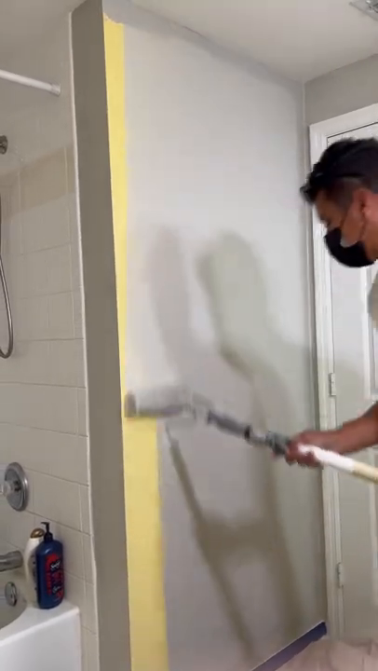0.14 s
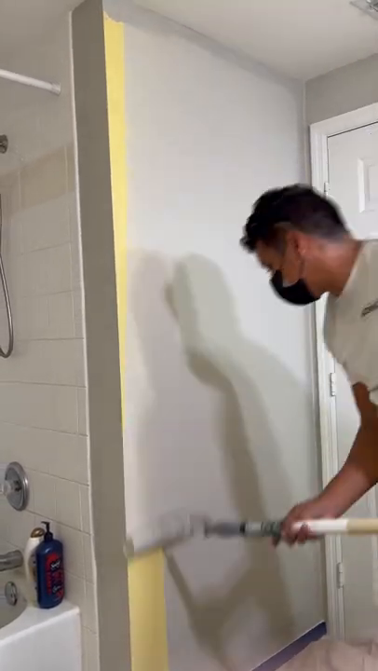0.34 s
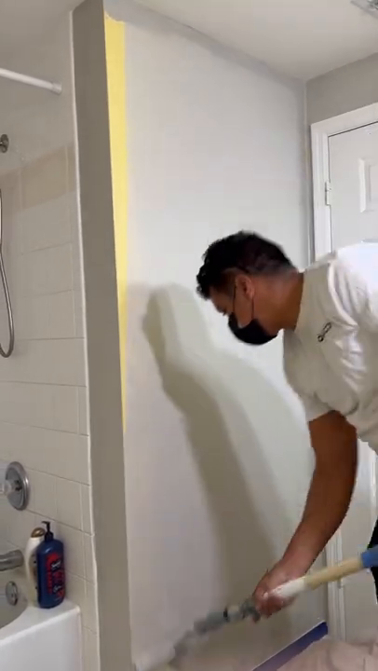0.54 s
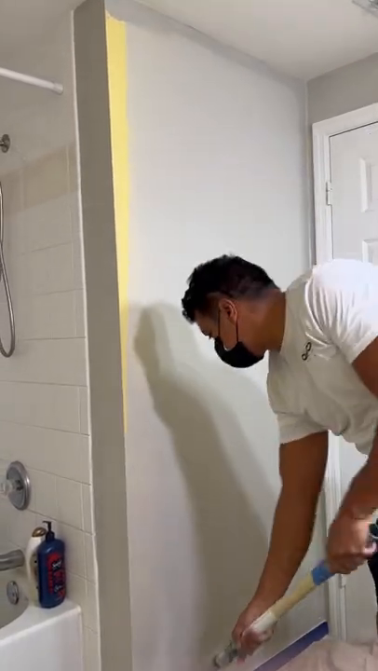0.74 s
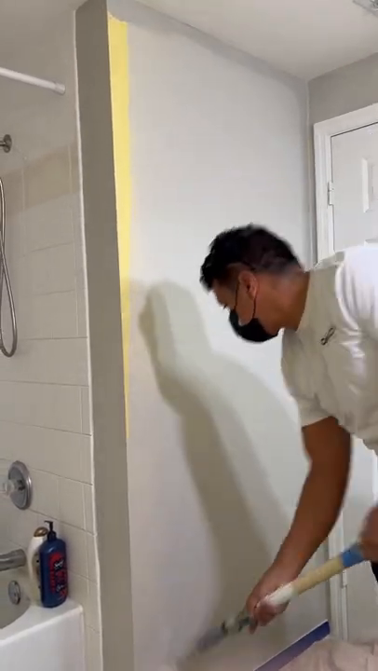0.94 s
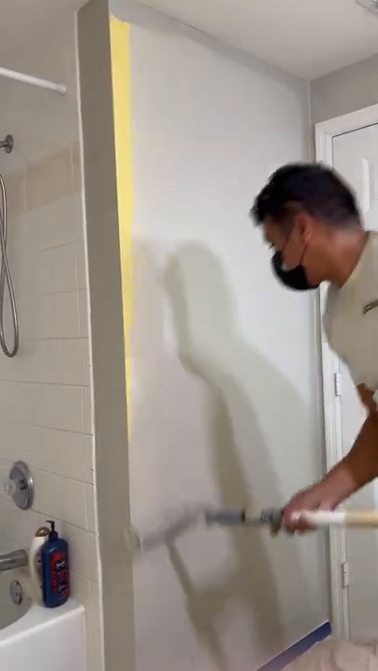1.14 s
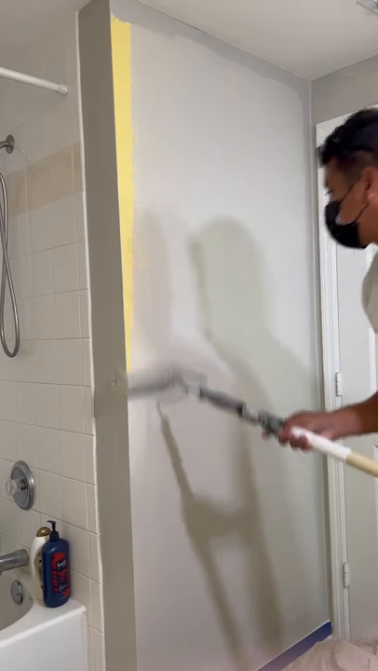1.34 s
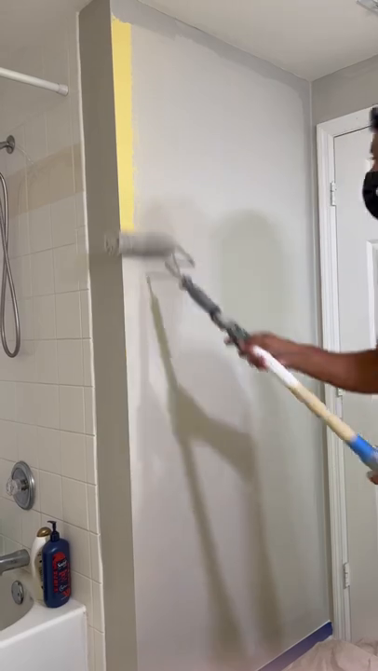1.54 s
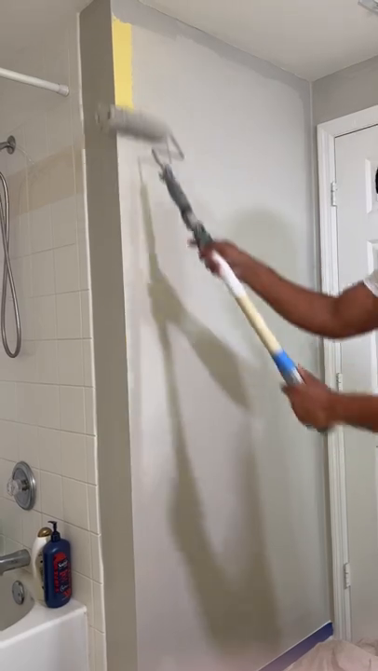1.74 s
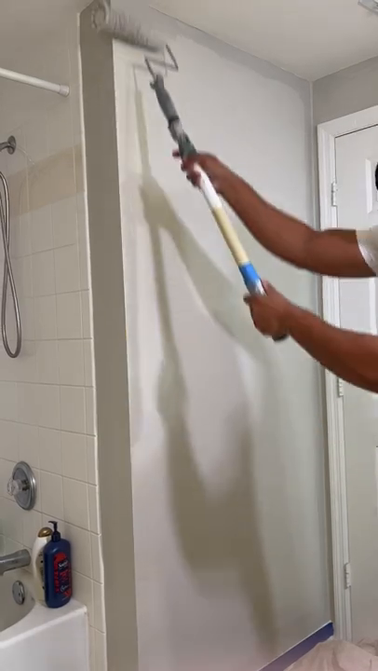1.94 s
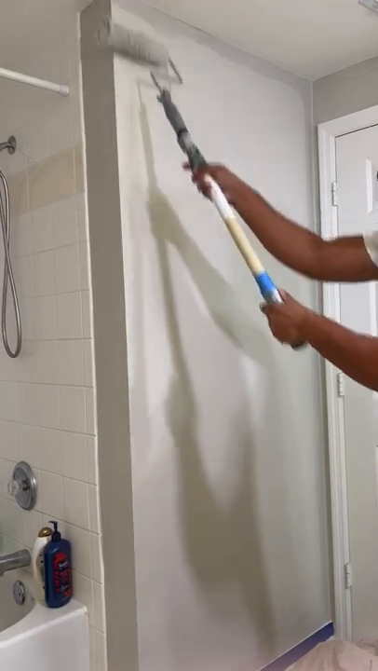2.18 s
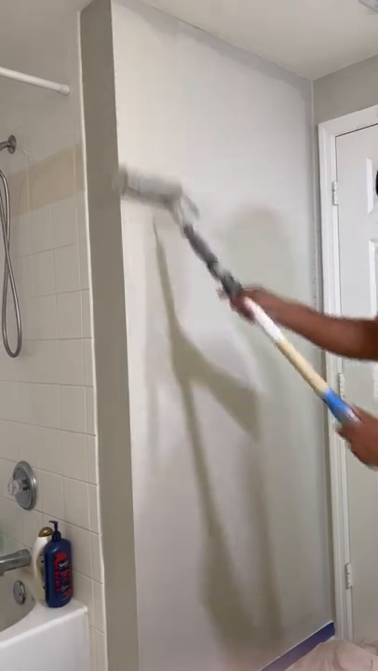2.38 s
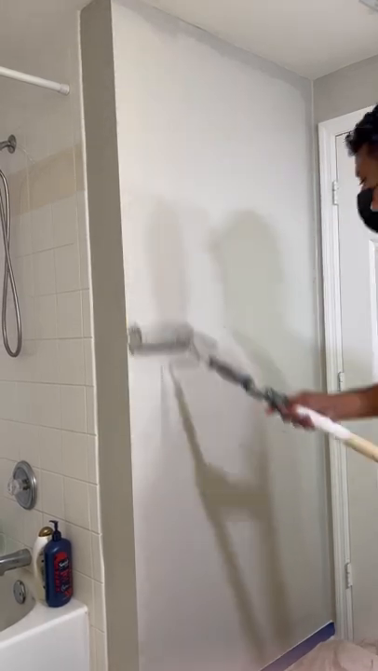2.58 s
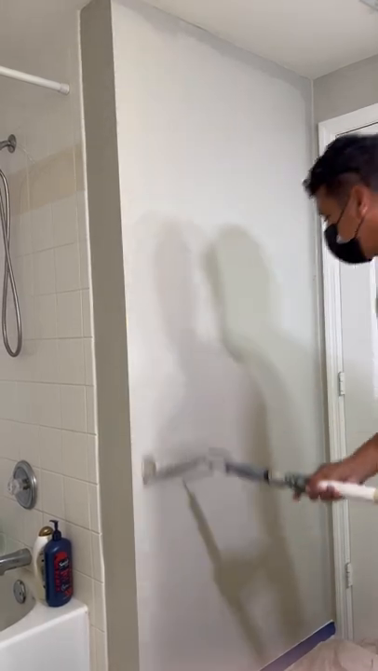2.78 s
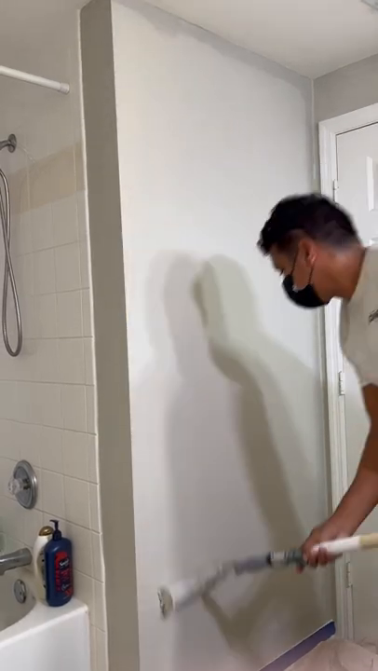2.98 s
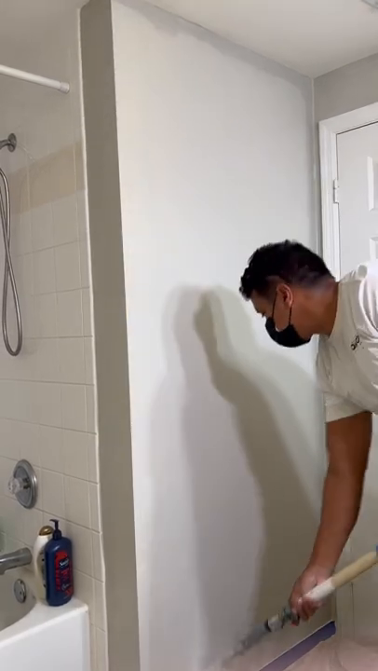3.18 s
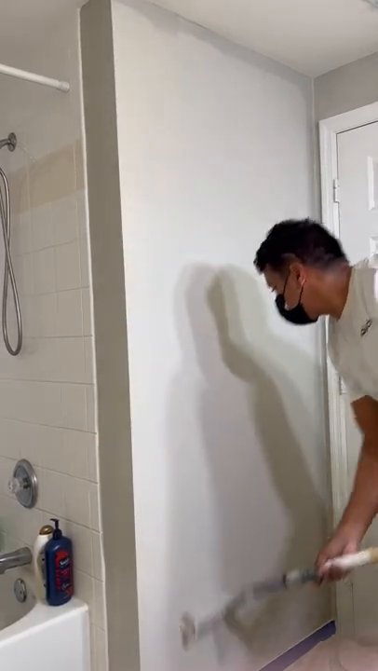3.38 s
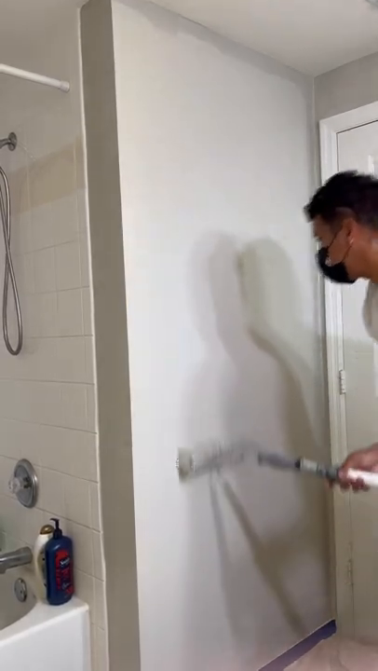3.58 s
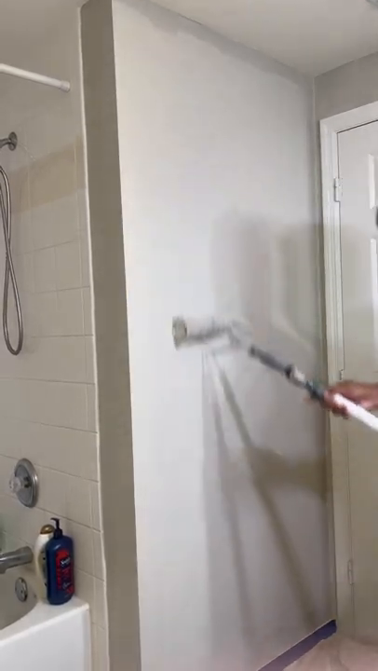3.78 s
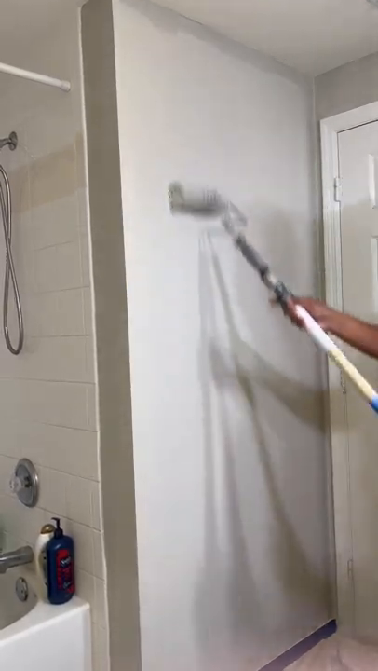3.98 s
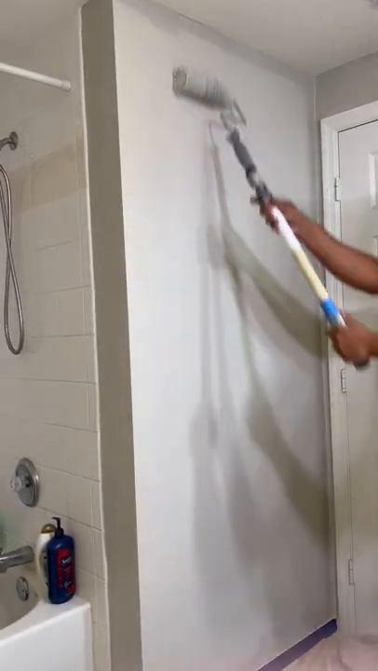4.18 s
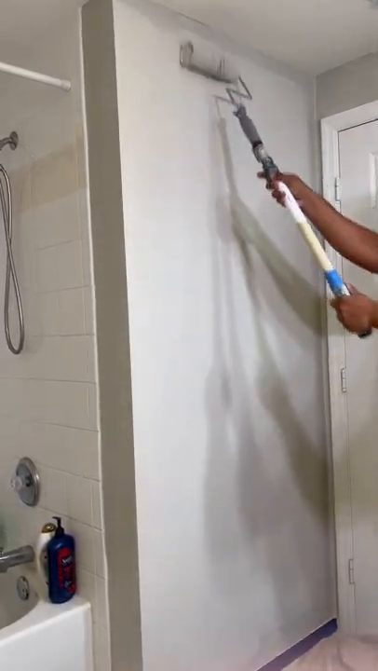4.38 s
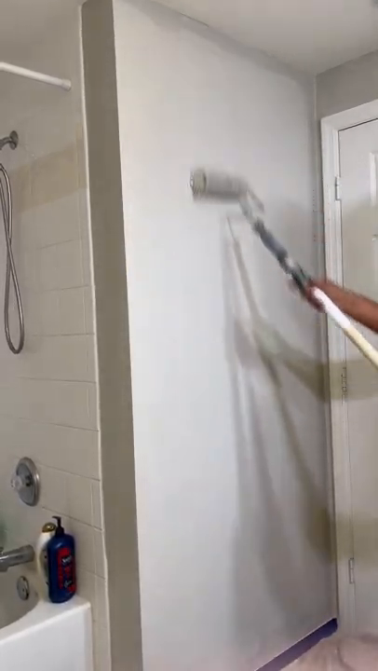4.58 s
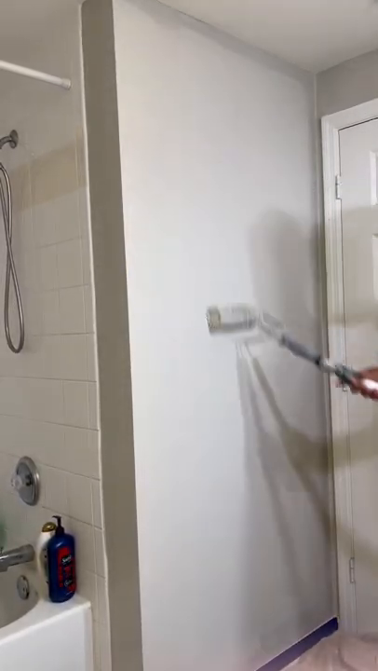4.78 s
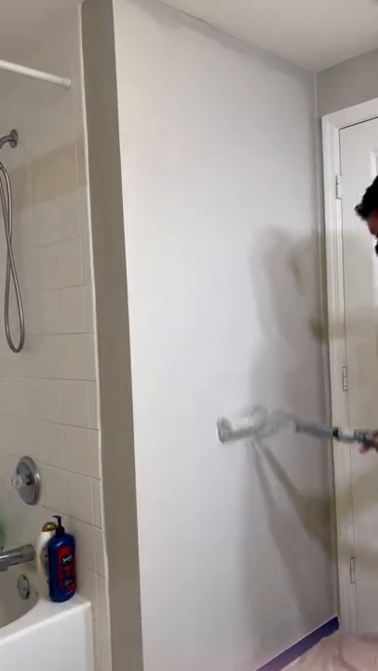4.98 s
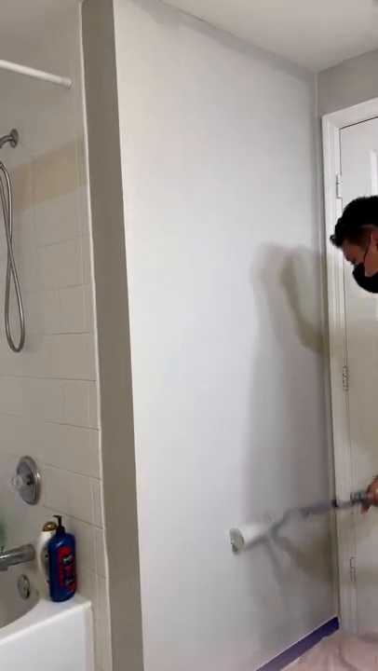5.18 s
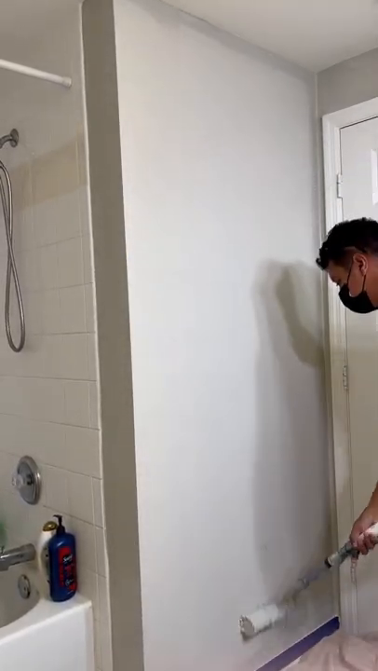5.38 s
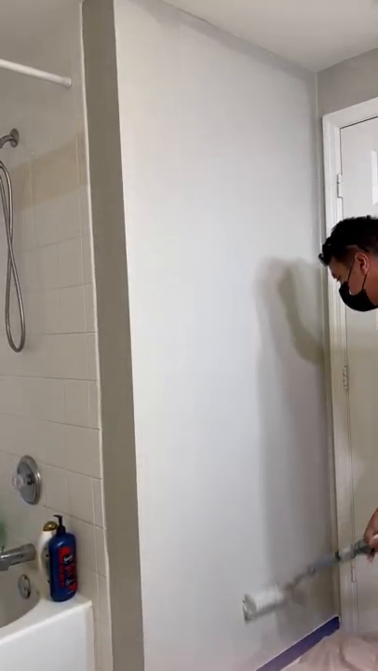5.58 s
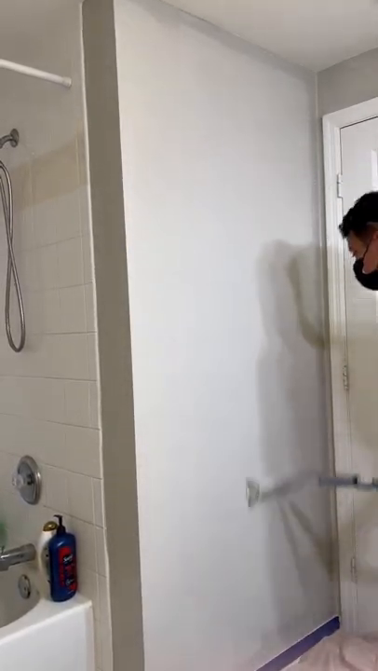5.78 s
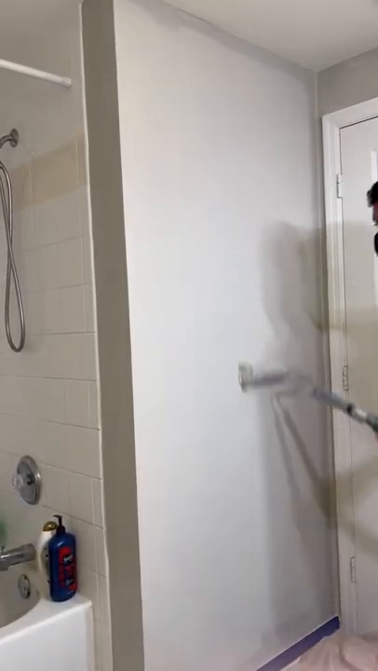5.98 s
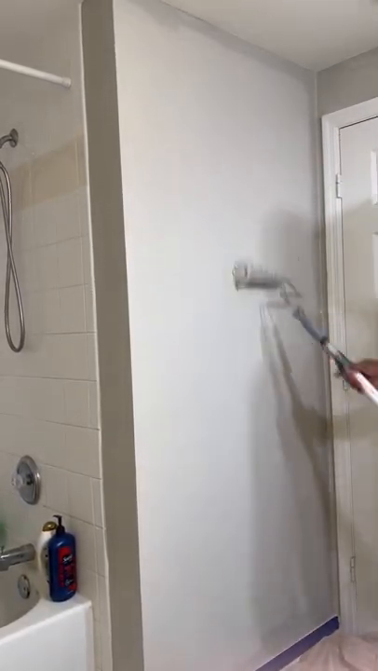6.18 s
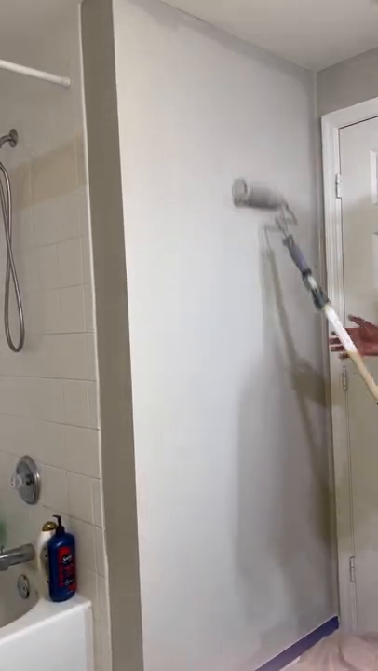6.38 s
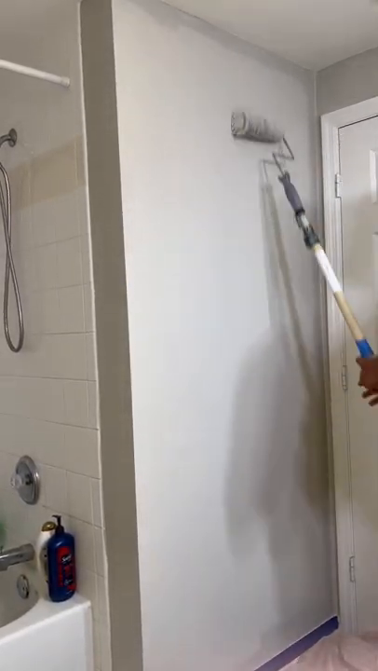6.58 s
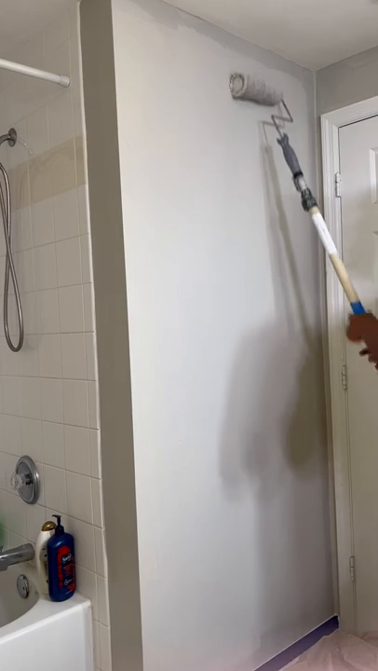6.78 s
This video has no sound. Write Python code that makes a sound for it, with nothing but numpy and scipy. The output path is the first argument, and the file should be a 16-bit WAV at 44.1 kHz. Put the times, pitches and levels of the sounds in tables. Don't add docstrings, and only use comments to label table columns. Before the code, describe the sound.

Continuous wet, fine crackling hiss from a roller loaded with paint, with a hollow wall rumbling and thumping under it. Strokes last a little over a second, separated by short lulls. A bright metallic tick comes around one second, a duller knock and tiny rattles near six, then a short rubbery scuff. Near stereo microphone, short bright tiled reverberation, quiet low electrical fan hum.

```python
import sys
import numpy as np
from scipy import signal
from scipy.fft import rfft, irfft, next_fast_len
from scipy.io import wavfile
from scipy.ndimage import uniform_filter1d

SR = 44100
rng = np.random.default_rng(int(sys.argv[2]) if len(sys.argv) > 2 else 0)


def amplitude_ratio(level_db):
    exponent = np.asarray(level_db, float) / 20
    return 10 ** exponent


def to_wav(sig):
    pcm = np.clip(np.atleast_2d(sig), -1, 1) * 32767
    pcm = np.round(pcm).astype(np.int16)
    wavfile.write(sys.argv[1], SR, pcm.T)


N = 301203
SIZE = next_fast_len(N + SR // 2)
HZ = np.maximum(np.arange(SIZE // 2 + 1) * SR / SIZE, 1)
TIME_S = np.arange(N) / SR
COARSE_S = np.arange(0, N, 32) / SR

# (pitch [Hz], width [Hz], level [dB])
WALL_MODES = [
    [(67, 4.2, -2), (74, 8.8, -1.5)],
    [(83.6, 5.2, -1.5), (96.1, 5.9, -5)],
    [(112.7, 17, 2), (143.3, 6.6, -0.5), (163, 11, -9)],
    [(168.2, 11.4, -1), (191.2, 11.4, 5), (238.7, 11.7, 1), (259.5, 6.8, 0.5), (289.4, 7.9, -2.5),
     (331.8, 18, 3.5), (374.7, 14, 2), (430, 24, -3), (451, 15, -10)],
]
# (time [s], speed as fizz level [dB], pressure [dB])
ARM_MOTION = [(0, -39, 0), (.2, -40.5, -0.5), (.5, -40.5, -1), (.7, -41, -3.5), (1.05, -40.5, -1.5),
              (1.45, -40, 0.8), (1.84, -45, 4), (2.45, -37, -3.1), (2.75, -41, -2), (3.05, -43, -1.5),
              (3.5, -41, 2.5), (3.95, -41.5, 2), (4.7, -39.5, -0.8), (5.05, -43, -0.5), (5.3, -41.5, -2.5),
              (5.83, -45.5, 3.5), (6.1, -41, -1), (6.55, -42.5, 1)]


def rms_one(x):
    return x / np.sqrt(np.mean(x ** 2) + 1e-20)


def in_time(rows):
    s, *columns = np.transpose(rows)
    return [np.interp(TIME_S, s, c) for c in columns]


def at_hz(points, hz):
    points = np.array(points)
    return np.interp(np.log(hz), np.log(points[:, 0]), points[:, 1])


def drift(rate_hz):
    hop, run_in = 40, 2000
    r = np.exp(-2 * np.pi * rate_hz * hop / SR)
    noise = rng.standard_normal(N // hop + run_in + 2)
    slow = signal.lfilter([1], [1, -2 * r, r * r], noise)[run_in:]
    return np.interp(np.arange(N) / hop, np.arange(len(slow)), rms_one(slow))


def sparse_kicks(shape, per_s):
    happens = rng.random(shape) < per_s / SR
    return rng.standard_normal(shape) * happens + 1e-18


def resonance(x, hz, width_hz):
    r = np.exp(-np.pi * width_hz / SR)
    feed = np.array([1, 0, -1]) * (1 - r * r) / 2
    return signal.lfilter(feed, [1, -2 * r * np.cos(2 * np.pi * hz / SR), r * r], x)


def to_ears(mid, side):
    return np.array([mid + side, mid - side])


def tiled_room():
    t60_s, echo_db = 0.53, -11.5
    per_s = -np.log(1000) * (1 + HZ / 9000) / t60_s - 2j * np.pi * HZ
    tail = 0
    for k, lag_s in enumerate(rng.uniform(.017, .045, 8)):
        echo = np.exp(per_s * lag_s)
        tail = tail + (-1) ** k * echo / (1 - echo)
    return 1 + amplitude_ratio(echo_db) * tail / np.sqrt(np.mean(abs(tail) ** 2))


def building():
    hz, width_hz, level_db = 44, 19, -57
    murmur = resonance(rng.standard_normal(N), hz, width_hz)
    return amplitude_ratio(level_db) * rms_one(resonance(murmur, hz, width_hz))


def fan():
    hum_hz, hum_db = 120, -53.5
    return np.sqrt(2) * amplitude_ratio(hum_db + 5.1 * drift(3.8)) * np.sin(2 * np.pi * hum_hz * TIME_S)


def scuff(slips_per_s=2500, width_db=0.5):
    # (time [s], level [dB])
    scuff_level = [
        (6.34, -56),
        (6.39, -45),
        (6.45, -43),
        (6.5, -47.5),
        (6.56, -61),
    ]
    # (pitch [Hz], width [Hz], level [dB])
    sole = [(740, 80, -5), (830, 130, 4), (1300, 140, -5)]
    slips = sparse_kicks((2, N), slips_per_s)
    rung = rms_one(sum(amplitude_ratio(db) * resonance(slips, hz, width_hz) for hz, width_hz, db in sole))
    moving = (TIME_S > scuff_level[0][0]) & (TIME_S < scuff_level[-1][0])
    mid, side = amplitude_ratio(in_time(scuff_level)[0]) * moving * rung
    return to_ears(mid, amplitude_ratio(width_db) * side)


def frame():
    # (time [s], peak level [dB], left minus right [dB], brightness [dB per octave])
    knocks = [
        (1.041, -29.5, 1, 3),
        (5.908, -34, 5, -10),
        (6.07, -48, 3, 2),
        (6.089, -46, 4, 5),
        (6.12, -48, 4, 0),
    ]
    # (pitch [Hz], level [dB], time to fall 60 dB [s])
    wire_modes = [(760, -2, .07), (952, 4, 0.14), (1220, -3, 0.071), (1490, -2, .12), (1720, 1, 0.082),
                  (1990, -20, .05), (1100, 1.5, .02), (560, 1, .03)]
    at_s, peak_db, lean_db, bright_db = np.array(knocks).T
    at = np.round(at_s * SR).astype(int)
    chance_db = rng.normal(0, 1.5, (len(at), len(wire_modes)))
    out = 0
    for k, (hz, mode_db, t60_s) in enumerate(wire_modes):
        knock_db = peak_db + mode_db - 14.0 + bright_db * np.log2(hz / 1000) + chance_db[:, k]
        clicks = np.zeros((2, N)) + 1e-18
        clicks[:, at] = amplitude_ratio(knock_db + lean_db * [[.5], [-.5]])
        r, w = amplitude_ratio(-60 / (t60_s * SR)), 2 * np.pi * hz / SR
        out = out + (-1) ** k * signal.lfilter([0, np.sin(w)], [1, -2 * r * np.cos(w), r * r], clicks)
    return irfft(rfft(out, SIZE) * tiled_room(), SIZE)[:, :N]


def follow(speed, pressure, drop, stretch, wall=False):
    # (time [s], slowing [s], speeding up [s], fizz drop [dB], wall drop [dB])
    turns = [
        (0.825, 0.068, 0.074, 17, 17),
        (2.075, 0.096, 0.13, 19, 31),
        (3.26, 0.065, 0.076, 16, 18.5),
        (4.355, 0.071, 0.072, 16.5, 17.5),
        (5.49, 0.047, .06, 14, 7.5),
        (6.72, 0.12, 0.15, 9, 12),
    ]
    # (time [s], pressure [dB], speed [dB], half length [s])
    shoves = [(0.023, 2.5, -0.8, .04), (0.45, 3.5, -0.5, 0.028), (0.632, 1, -3, .04), (1.09, 4.5, .5, .06),
              (1.605, 1.5, -0.5, .03), (1.7, -1.5, 0.2, 0.027), (1.84, 5, -1.5, .03),
              (2.285, -1.5, 0.7, .05), (2.47, 4.5, -0.5, 0.11), (3.024, 4, 1, 0.046), (3.51, 6, 0.5, .05),
              (3.69, 2, -1.5, 0.06), (3.766, -2.5, 1.5, 0.016), (3.96, 3.5, 1.5, .05),
              (4.09, 3, 1.5, 0.044), (4.214, 3, -2.5, 0.014), (4.504, 4, 1.5, 0.032),
              (4.645, 3, -0.3, 0.066), (5.204, 2, .1, .03), (5.7, 1, 0, .05), (5.88, -6.5, -2, 0.03),
              (5.93, 2, .1, .02), (6.08, 4.5, .5, 0.033), (6.35, -1.5, 1.5, 0.046), (6.452, 2.3, 2, 0.082),
              (6.785, -3.5, 1.5, .03)]
    speed_db, pressure_db = [c[::32] for c in in_time(ARM_MOTION)]
    speed_db = speed_db - speed_db.mean()
    for at_s, push_db, hurry_db, half_s in shoves:
        bump = np.exp(-((COARSE_S - at_s) / half_s) ** 2)
        speed_db = speed_db + hurry_db * bump
        pressure_db = pressure_db + push_db * bump
    lull_db = 0
    for at_s, slowing_s, speeding_s, fizz_drop_db, wall_drop_db in turns:
        before, after = (at_s - COARSE_S) / slowing_s, (COARSE_S - at_s) / speeding_s
        away = np.where(COARSE_S < at_s, before, after) / stretch
        lull_db = lull_db + (wall_drop_db if wall else fizz_drop_db) * np.exp(-away ** 1.08)
    return np.interp(TIME_S, COARSE_S, speed * speed_db + pressure * pressure_db - drop * lull_db)


def drumming():
    # (steady level [dB], share of speed [1], share of pressure [1], share of the drop [1], stretch of the turn [1])
    wall_follow = [(-41.5, .5, 0.32, 0.61, 1.7), (-48, .5, .3, 0.83, 1.6), (-47, 0.62, 0.4, 0.58, 1.53),
                   (-46.5, 1.01, 0.72, 0.59, 1.68)]
    # (time [s], level [dB], half length [s], pitch [Hz])
    booms = [(0.03, -31, 0.027, 77), (0.203, -38, .05, 70), (0.43, -36, 0.033, 135),
             (0.506, -32.5, 0.091, 69), (1.03, -34, 0.041, 69), (1.175, -32.5, 0.046, 78),
             (1.491, -36.5, .12, 78), (1.515, -36, 0.056, 131), (1.752, -37, 0.073, 69),
             (2.322, -29.5, 0.06, 67.5), (2.444, -34, .05, 145), (2.531, -37, 0.088, 88.5),
             (2.59, -37.5, 0.085, 135), (2.76, -37.5, 0.12, 68), (2.942, -37.5, 0.036, 78),
             (3.06, -38.5, 0.091, 147), (3.145, -38, 0.039, 68), (3.395, -35.5, 0.07, 101.5),
             (3.5, -41, .04, 70), (3.723, -38.5, 0.096, 73.4), (3.89, -36, 0.053, 75),
             (3.903, -34, 0.053, 125), (4.085, -32, 0.079, 70.7), (4.27, -37.5, 0.063, 68),
             (4.46, -36, 0.049, 75), (4.61, -31, 0.047, 76.5), (4.95, -34, 0.083, 71),
             (5.17, -34.5, 0.083, 88), (5.716, -40, 0.07, 77.5), (6.01, -37.5, 0.051, 78.6)]
    # (time [s], level [dB], half length [s], pitch [Hz])
    more_booms = [(0.047, -37, .08, 135), (.6, -50, .05, 120), (1.117, -41, .05, 125),
                  (2.283, -38.5, 0.035, 138), (2.75, -41.5, 0.12, 136), (2.894, -41, 0.065, 115),
                  (3.2, -44, .04, 125), (4.497, -43, 0.044, 123), (4.66, -40, .05, 118),
                  (4.81, -37, 0.048, 107.5), (5.347, -41, 0.046, 110), (5.827, -42, 0.032, 99),
                  (6.3, -43.5, .07, 89), (6.49, -41, .08, 95), (6.646, -42, 0.039, 75)]
    reach_oct = 0.17
    hits = np.concatenate([np.array(booms), np.array(more_booms)])
    at_s, boom_db, half_s, boom_hz = hits.T[:, :, None]
    levels = []
    for (steady_db, *shares), modes in zip(wall_follow, WALL_MODES):
        octaves = abs(np.log2(boom_hz / np.array(modes)[:, 0]))
        apart = np.min(octaves, axis=1, keepdims=True) / reach_oct
        swell = np.exp(-((COARSE_S - at_s) / half_s) ** 2 - apart ** 2)
        boom_power = np.sum(amplitude_ratio(boom_db) ** 2 * swell, axis=0)
        rolling_power = amplitude_ratio(steady_db + follow(*shares, wall=True)) ** 2
        levels.append(10 * np.log10(rolling_power + np.interp(TIME_S, COARSE_S, boom_power)))
    return levels


def panel(bumps_per_s=900, wander_db=3.0, lean=0.26):
    # (pitch [Hz], side minus mid [dB])
    wall_side = [(60, -31), (90, -52), (130, -27.5), (200, -16), (300, -15.5), (450, -21.5)]
    out, run_in = 0, SR // 4
    for level_db, modes in zip(drumming(), WALL_MODES):
        group = 0
        bumps = sparse_kicks((2, 2, N + run_in), bumps_per_s)
        for k, (hz, width_hz, mode_db) in enumerate(modes):
            rung = resonance(bumps[k % 2], hz, width_hz)
            rung = resonance(rung, hz, 3.5 * width_hz)[:, run_in:]
            rung = rms_one(rung) * amplitude_ratio(mode_db + wander_db * drift(1.75))
            rung[1] = amplitude_ratio(at_hz(wall_side, hz)) * (rung[1] + lean * rung[0])
            group = group + rung
        slow = uniform_filter1d(uniform_filter1d(group[0] ** 2, size=SR // 18), size=SR // 18)
        group = amplitude_ratio(level_db) * group / np.sqrt(slow + 1e-9)
        edges_hz = [modes[0][0] * 0.76, modes[-1][0] * 1.16]
        out = out + signal.sosfilt(signal.butter(2, edges_hz, "band", fs=SR, output="sos"), group)
    return to_ears(*out)


def tearing():
    # (time [s], level [dB])
    paint_load = [(0, 1), (.5, 1.5), (1.2, -0.2), (2.2, 3.5), (2.6, 1), (3.3, 1.5), (3.8, -1), (4.6, 1),
                  (5.7, 1), (6.1, -1), (6.5, -3), (6.83, 0.5)]
    fizz_db = follow(speed=1, pressure=0, drop=1, stretch=1)
    squelch_db = follow(speed=0.79, pressure=0.64, drop=.75, stretch=1.58) - fizz_db
    middle_db = follow(speed=0.97, pressure=0.43, drop=0.95, stretch=1.49) - fizz_db
    spray_db = follow(speed=0.76, pressure=-0.092, drop=1, stretch=0.95) - fizz_db
    mean_db = in_time(ARM_MOTION)[0].mean()
    return fizz_db + mean_db, squelch_db, middle_db, spray_db + in_time(paint_load)[0]


def paint(tears_per_s=20000, size_spread_db=2.2, flutter_db=.5):
    # (pitch [Hz], level [dB per Hz])
    fizz_mid = [(250, -25), (420, -1.5), (490, -2.5), (760, -6.5), (1260, -6.5), (2400, -5.5), (3650, -4.5),
                (5400, -3), (7500, -4.5), (9760, -10.5), (11200, -11.5), (11800, -15.5), (12300, -26.5),
                (16000, -27)]
    # (pitch [Hz], level [dB per Hz])
    fizz_side = [(250, -16), (420, -5.5), (720, -2.5), (1710, -6), (2080, -3), (3800, -3), (4900, -0.5),
                 (5600, -2), (6100, -38), (7000, -23), (7700, -10), (9000, -7), (11300, -1.5), (15700, -10)]
    # (pitch [Hz], in step = leans left [1], quarter cycle late = left lags [1])
    shared_part = [(340, 0.56, .03), (690, 0.33, .2), (1030, 0.12, .28), (1600, -0.14, .01),
                   (2400, 0.22, .05), (3400, 0.02, .34), (4800, 0.14, .5), (5200, -0.013, .03),
                   (7300, .01, .1), (8400, .01, .66), (11300, -0.011, .74), (12500, .01, .5)]
    # (centre [Hz], curve it follows [0 squelch, 1 middle, 2 plain fizz, 3 spray], patchiness [dB])
    fizz_bands = [(550, 0, .7), (950, 0, .7), (1500, 1, .7), (2400, 1, .6), (4000, 2, .6), (5000, 2, 1.5),
                  (6000, 2, .8), (9500, 3, 1.), (12000, 3, 2.2), (14500, 3, 2.)]
    dip_hz, dip_width_hz, dip_db = 4925, 410, -4.5
    side_db = -5.5

    tears = (rng.random((2, N)) < tears_per_s / SR) * rng.choice([-1, 1], (2, N))
    tears = tears * amplitude_ratio(size_spread_db * np.minimum(rng.exponential(1, (2, N)), 5))
    near, own = rfft(tears, SIZE) * [tiled_room(), tiled_room()]

    shared = np.array(shared_part)
    share = at_hz(shared[:, [0, 1]], HZ) - 1j * at_hz(shared[:, [0, 2]], HZ)
    rest = np.sqrt(np.clip(1 - abs(share) ** 2, 0, 1))
    shadow_db = dip_db * np.exp(-((HZ - dip_hz) / dip_width_hz) ** 2)
    mid = near * amplitude_ratio(at_hz(fizz_mid, HZ) + shadow_db)
    side = (share * near + rest * own) * amplitude_ratio(at_hz(fizz_side, HZ) + side_db)
    both = np.array([mid, side])
    scale = np.std(irfft(mid * ((HZ > 3000) & (HZ < 9000)), SIZE)[:N])

    fizz_db, squelch_db, middle_db, spray_db = tearing()
    offsets = [c - np.mean(c) for c in (squelch_db, middle_db, 0 * fizz_db, spray_db)]
    wobble_db = flutter_db * drift(11.3)
    centres = np.log2(np.array(fizz_bands)[:, 0])
    out = 0
    for k, (hz, follows, patchy_db) in enumerate(fizz_bands):
        window = np.interp(np.log2(HZ), centres, np.arange(len(fizz_bands)) == k)
        patches_db = patchy_db * np.array([drift(5), drift(5)])
        gain = amplitude_ratio(fizz_db + offsets[int(follows)] + wobble_db + patches_db)
        out = out + gain * irfft(both * window, SIZE)[:, :N] / scale
    return to_ears(*out)


def scene():
    return building() + fan() + scuff() + frame() + panel() + paint()


def band_limit(x):
    return signal.sosfilt(signal.butter(12, 15750, fs=SR, output="sos"), x)


def record(dry):
    wet = signal.sosfilt(signal.butter(2, 8.2, "high", fs=SR, output="sos"), dry)
    return band_limit(wet)


dry = scene()
out = record(dry)
to_wav(out)
```